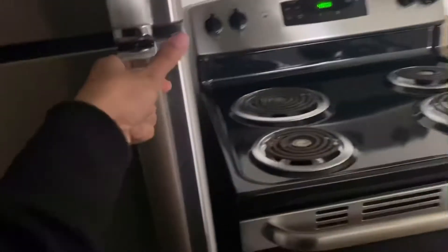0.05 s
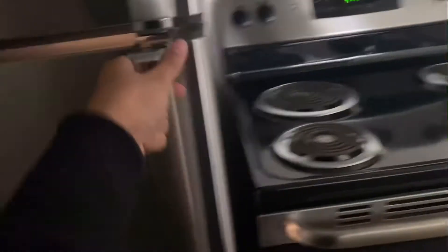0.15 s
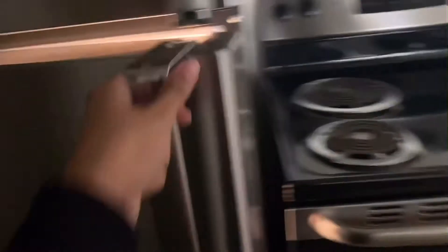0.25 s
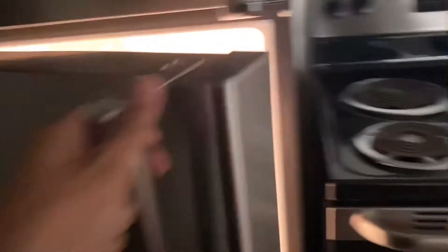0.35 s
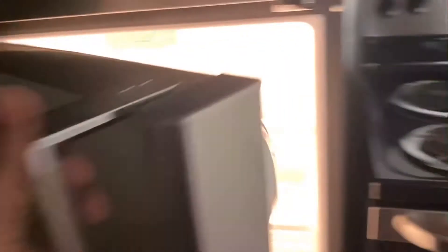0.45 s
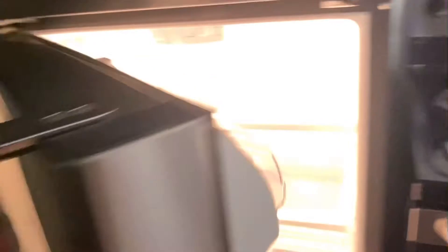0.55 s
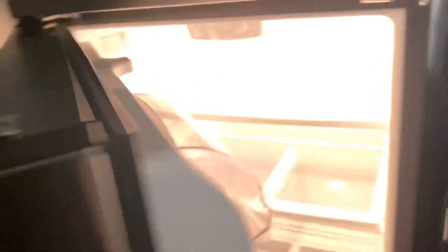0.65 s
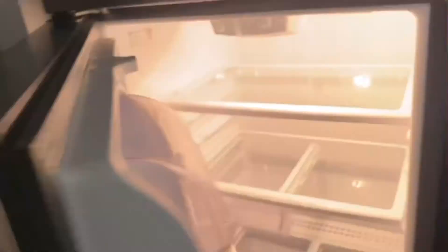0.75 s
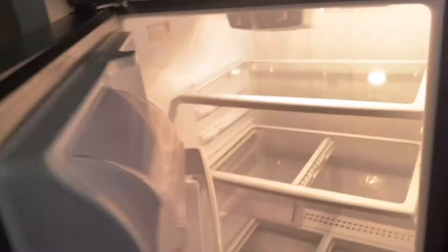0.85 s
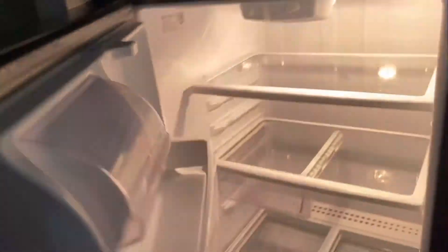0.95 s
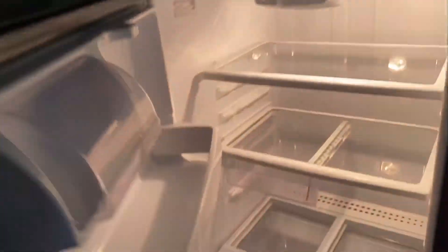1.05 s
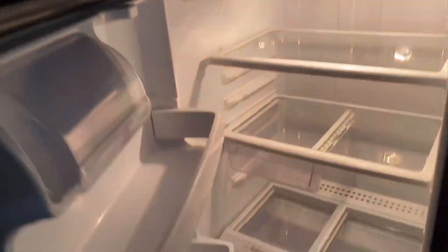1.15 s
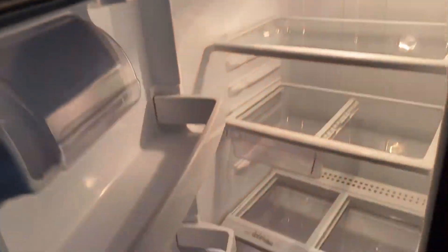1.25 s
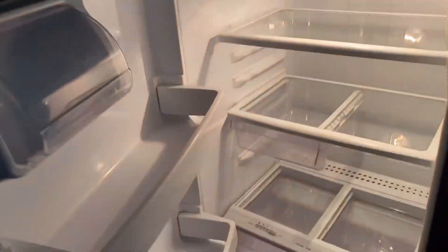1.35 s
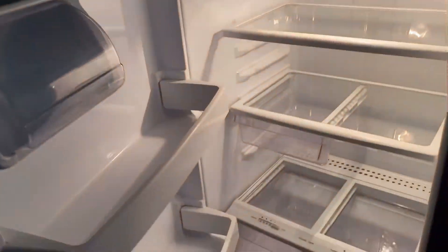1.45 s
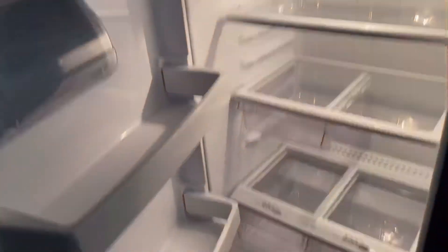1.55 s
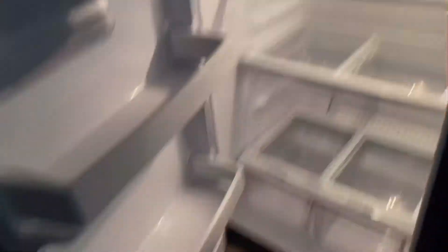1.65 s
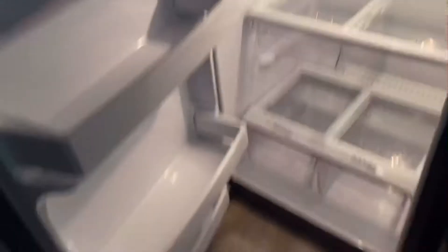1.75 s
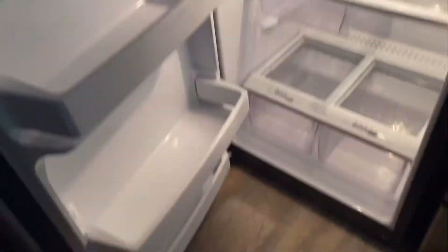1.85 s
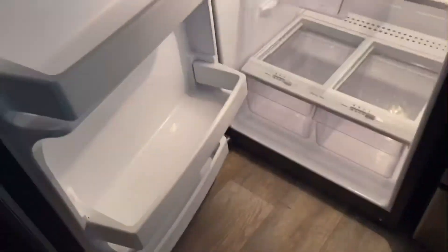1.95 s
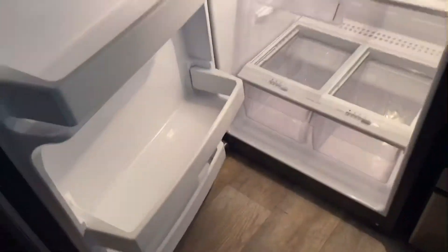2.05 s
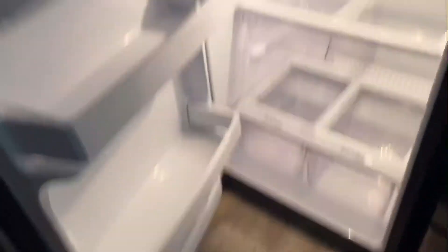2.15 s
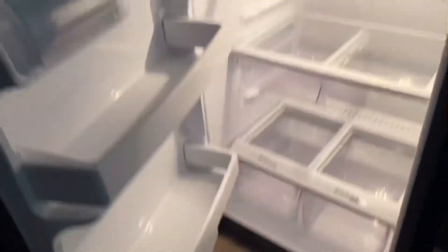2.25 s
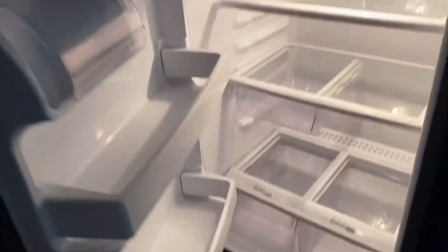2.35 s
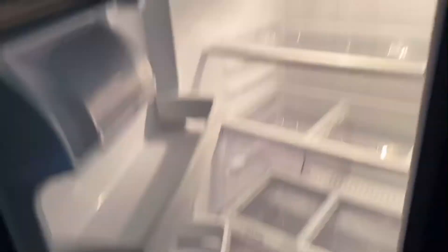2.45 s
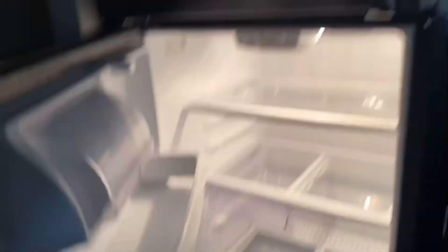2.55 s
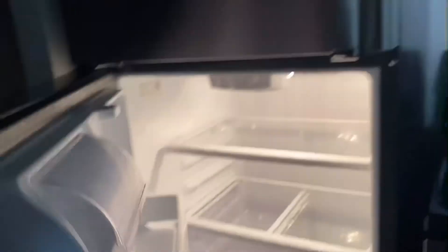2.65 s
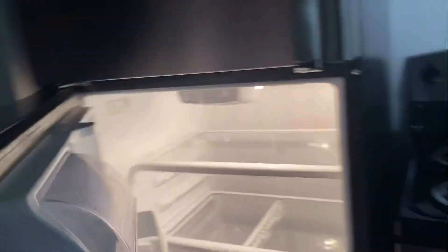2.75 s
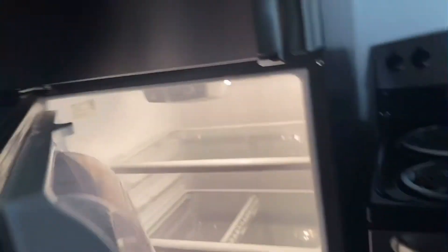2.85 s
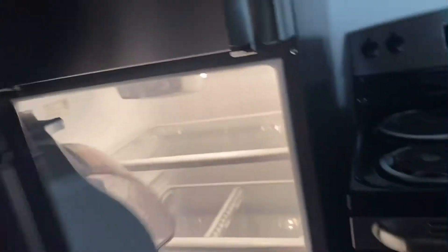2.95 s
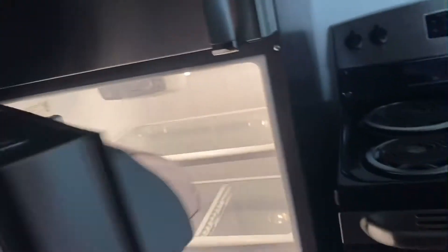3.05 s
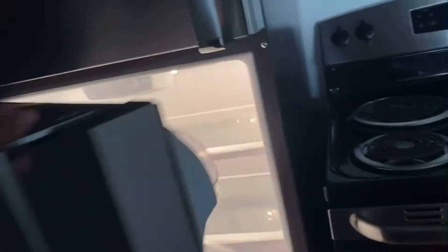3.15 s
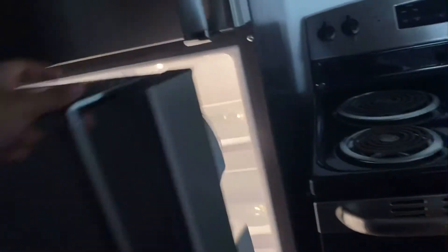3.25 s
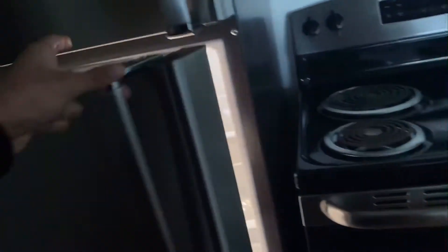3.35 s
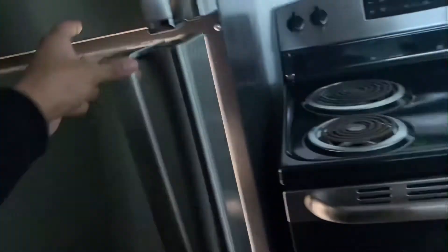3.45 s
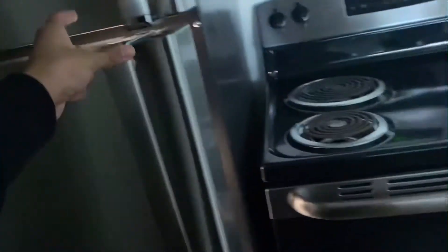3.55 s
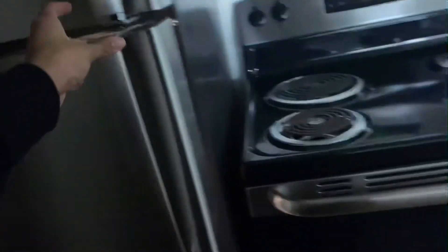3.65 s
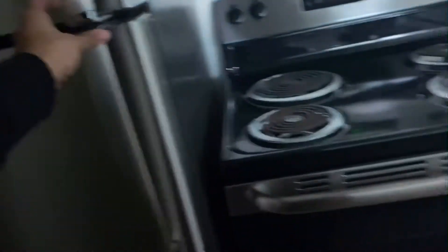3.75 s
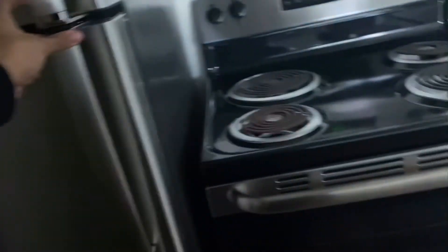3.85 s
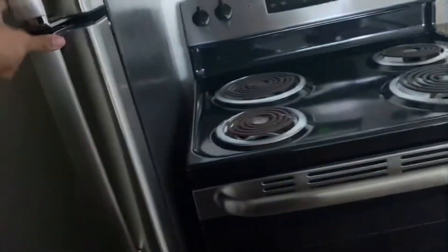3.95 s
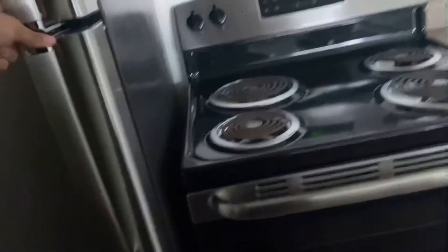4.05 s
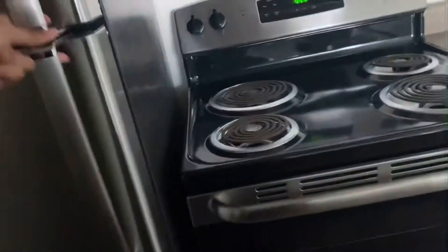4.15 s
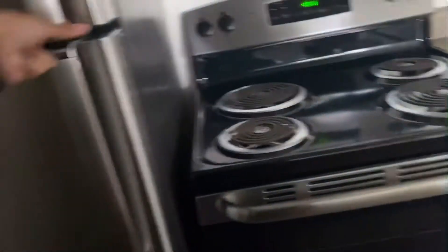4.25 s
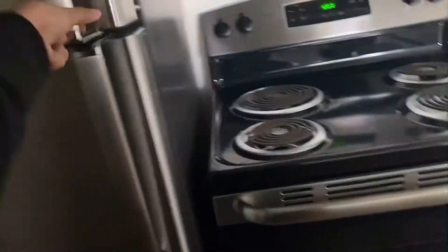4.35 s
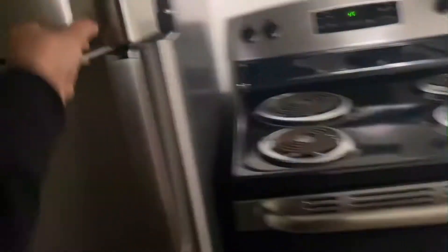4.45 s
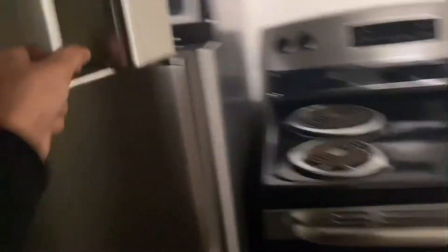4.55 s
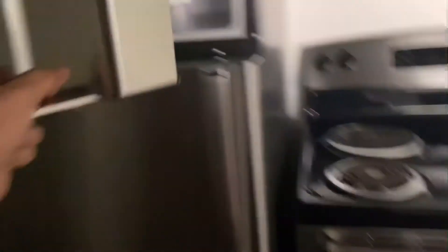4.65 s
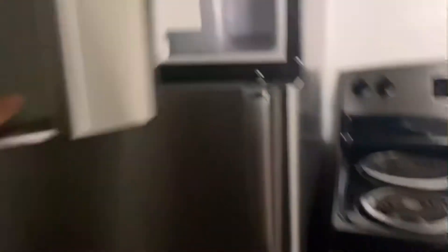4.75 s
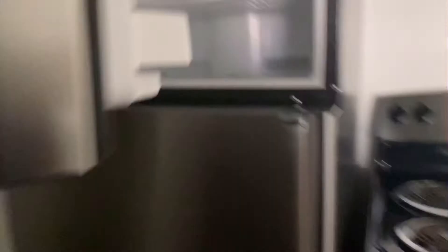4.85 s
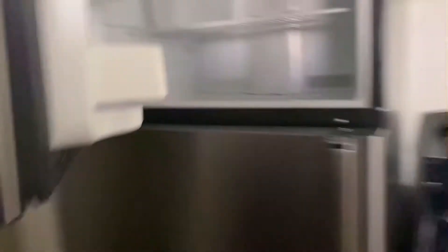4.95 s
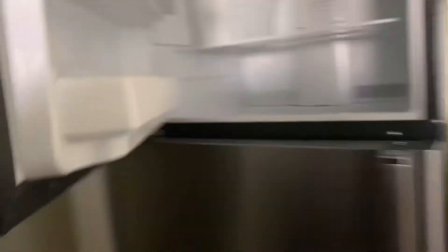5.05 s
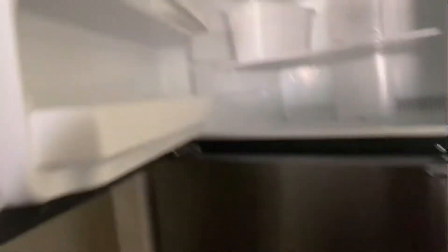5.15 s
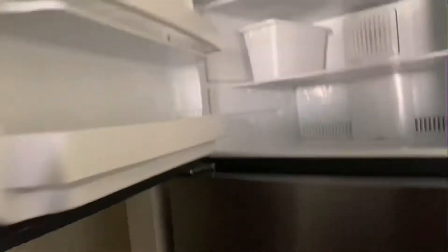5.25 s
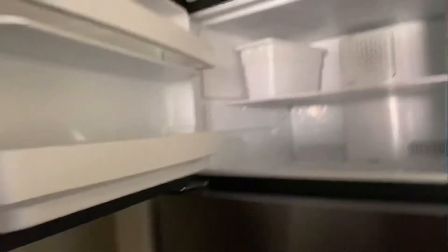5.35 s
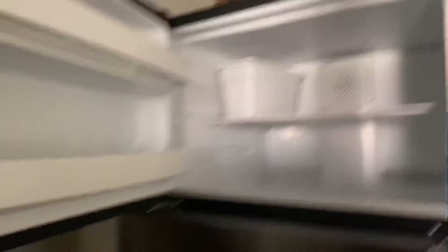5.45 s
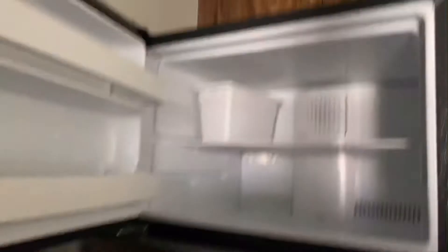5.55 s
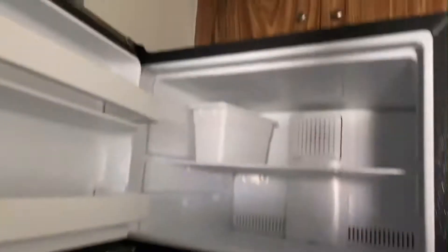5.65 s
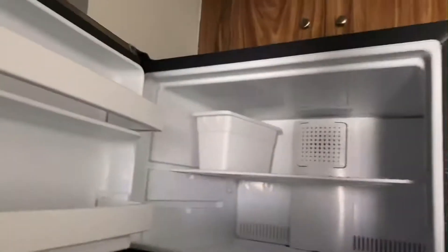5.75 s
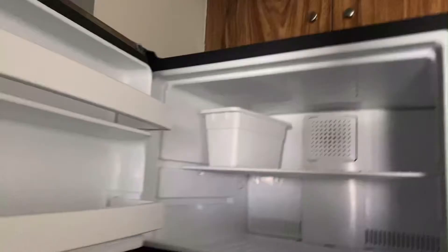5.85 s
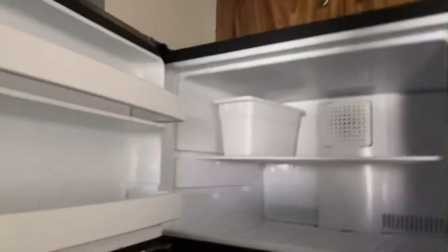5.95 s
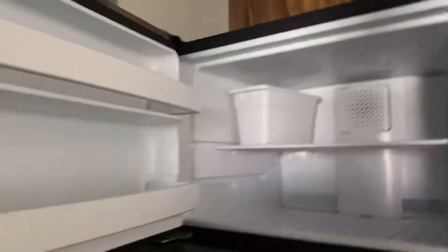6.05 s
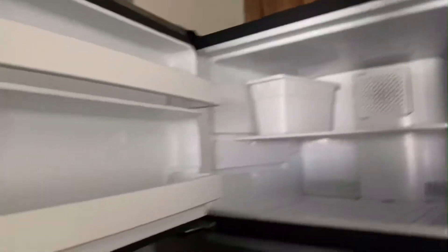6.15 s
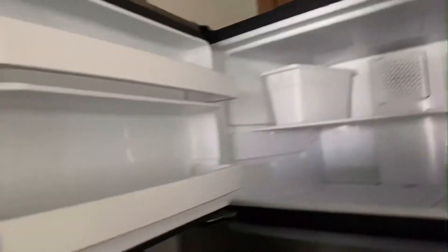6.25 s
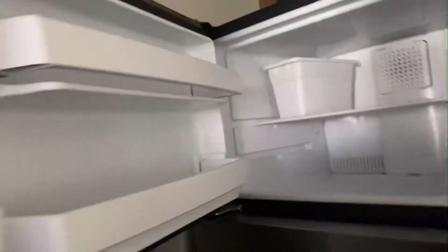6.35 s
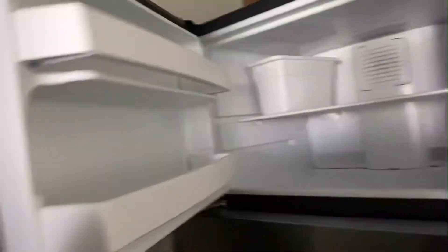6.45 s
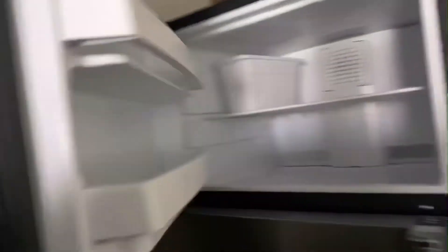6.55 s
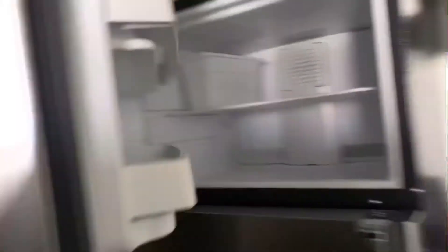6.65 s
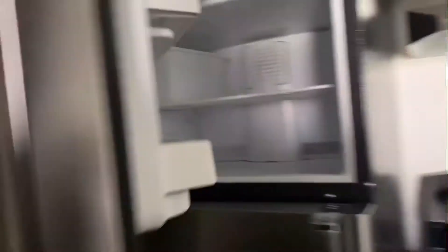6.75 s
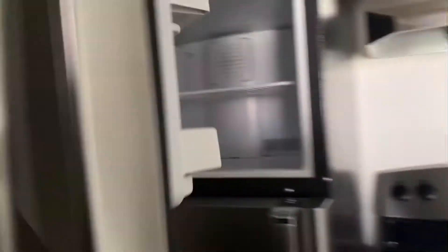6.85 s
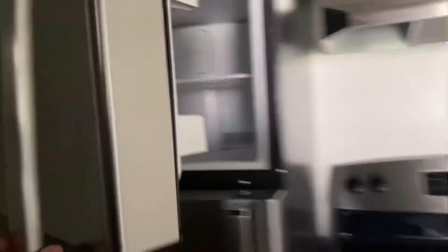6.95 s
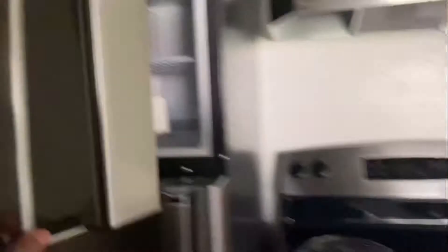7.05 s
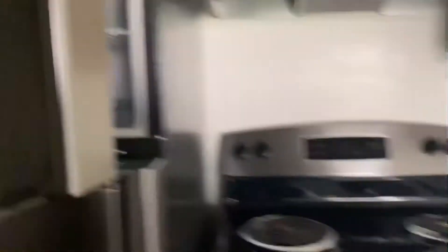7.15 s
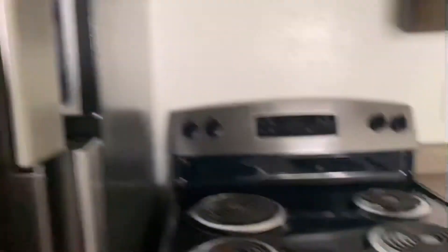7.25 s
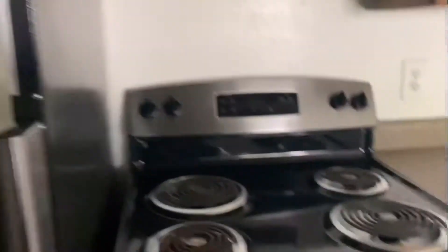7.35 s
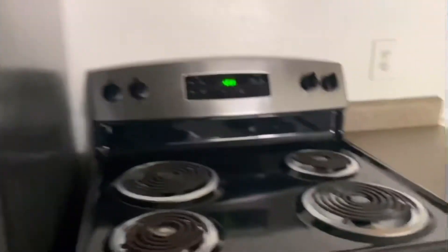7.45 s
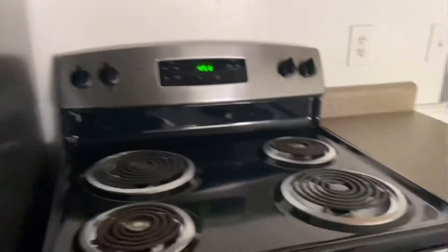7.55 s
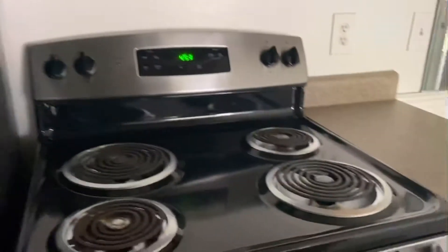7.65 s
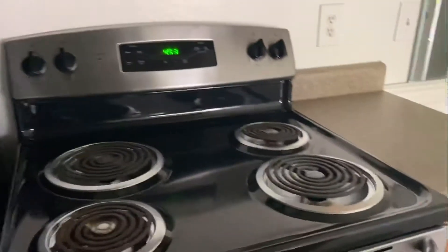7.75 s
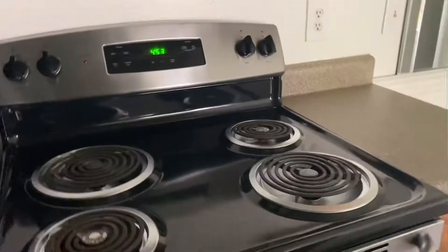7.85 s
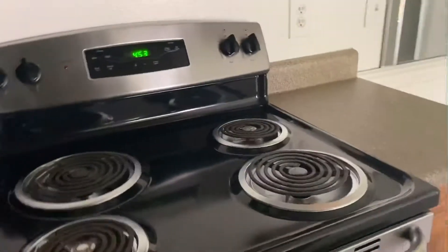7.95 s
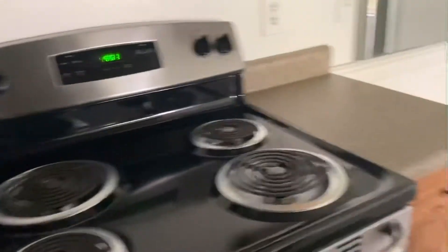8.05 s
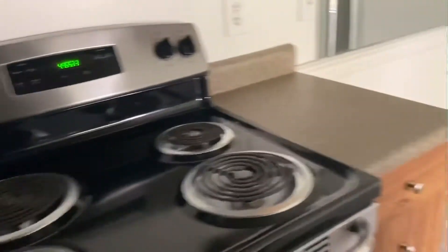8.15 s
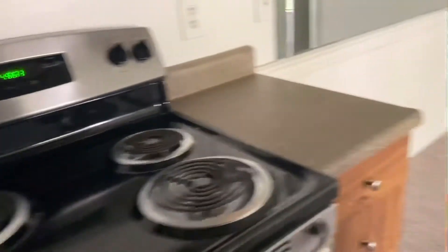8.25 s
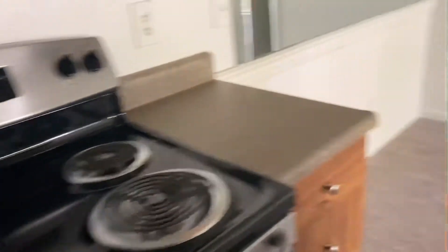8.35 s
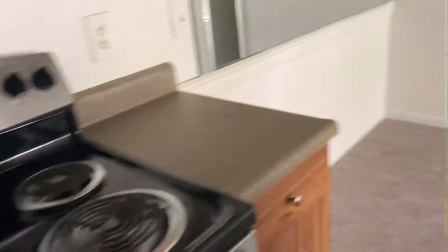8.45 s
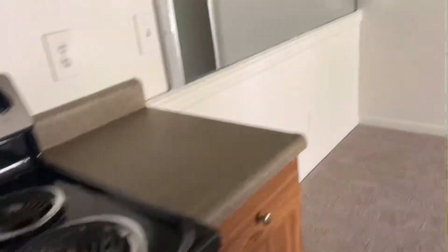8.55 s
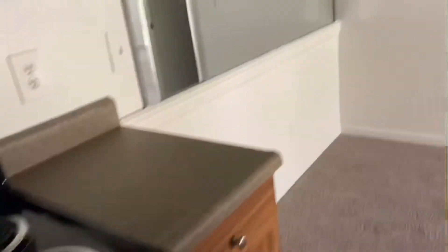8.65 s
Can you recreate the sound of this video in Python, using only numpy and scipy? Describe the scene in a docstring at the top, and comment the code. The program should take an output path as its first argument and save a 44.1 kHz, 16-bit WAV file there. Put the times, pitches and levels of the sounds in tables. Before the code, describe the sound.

Close, handheld stereo perspective in a small reverberant kitchen. Soft opening knock, faint ticks and dull hollow bumps as the fridge door swings, then a loud metallic slam with chattering handle. Half a second later the freezer handle snaps brightly and its door opens; after a quiet stretch of cloth rustle and soft footfalls, it slams with a hard crack and rattle.

```python
"""In a quiet kitchen a hand pulls a refrigerator open; its shelves tick as the door swings, and it is slammed.
The freezer handle clacks, that door opens and is slammed too. Soft steps, a sleeve and low ventilation lie beneath.
Slams layer a noise crack, shuddering panel noise, ringing modes and a falling flex chirp; fittings ring in modes.
Knocks, rubs, steps, cloth and air are shaped noise, crackles are tiny sine grains; a small hard room answers."""
import sys
import numpy as np
from scipy import signal
from scipy.fft import rfft, irfft, next_fast_len
from scipy.io import wavfile
from scipy.ndimage import uniform_filter1d

SR = 44100
rng = np.random.default_rng(int(sys.argv[2]) if len(sys.argv) > 2 else 0)


def transcribe(u):
    """Save the signal u as a 16-bit wav file named by the first command-line argument.

    u: samples, shape (n,) or (channels, n), limited to [-1, 1]; the rate is SR.
    q: integer samples, one column per channel.
    """
    v = np.clip(np.atleast_2d(u).T, -1, 1)
    q = np.round(v * 32767).astype(np.int16)
    wavfile.write(sys.argv[1], SR, q)


N = 383405  # length in samples

# Refrigerator slam: one row [t/s, bass level/dB, panel level/dB, crack level/dB, flex level/dB]
FRIDGE_SLAM = (3.717, -13.3, -17.3, -16.3, -8.5)
# What the refrigerator door rings with [f/Hz, level/dB, t60/s]
FRIDGE_MODES = [(58, 3, 0.16), (74, 8.5, 0.13), (122, 1, 0.15), (177.3, -0.5, 0.27), (241.4, -6, 0.22),
                (290.5, -3, 0.28), (354, -11, .25), (549, -6, 0.17), (590, -18, .33), (727, -17, 0.35),
                (784, -15, 0.29), (906, -30, .3), (1125, -27, .3), (1290, -23, 0.35), (1570, -25, 0.3),
                (2495, -26, 0.36), (2640, -25, 0.18)]
# Crowded higher modes of its steel skin and liner [f/Hz, level/dB per Hz]
FRIDGE_PANEL = [(25, -29), (70, 0), (220, 1), (480, -2), (750, -3.5), (1100, -7.5), (1700, -13.5),
                (2600, -14.5), (3600, -21.5), (7000, -29), (12000, -38), (16000, -39)]
# Its edge hitting the frame [f/Hz, level/dB per Hz]
FRIDGE_CRACK = [(200, -6), (800, -6), (1700, -4), (2600, 3), (5000, -6), (11000, -6), (16000, -15)]


def fridge_slam():
    """The refrigerator door hits its frame and sets skin, liner and cabinet ringing."""
    return slam(FRIDGE_SLAM, FRIDGE_MODES, FRIDGE_PANEL, FRIDGE_CRACK,
                crack_t60=0.017, panel_rise=0.0018, boom_cycles=2.0)


# Freezer slam: one row [t/s, bass level/dB, panel level/dB, crack level/dB, flex level/dB]
FREEZER_SLAM = (7.610, -10, -17.7, -10.8, -11)
# What the freezer door rings with [f/Hz, level/dB, t60/s]
FREEZER_MODES = [(57, 4.5, 0.18), (74, 6.5, 0.13), (106, -4, 0.2), (176.7, -10.5, 0.4), (291, -15.5, 0.36),
                 (353, -15, 0.27), (570, -17.5, 0.22), (655, -17, .2), (728, -13, 0.2), (836, -21, 0.18),
                 (1095, -20.5, 0.22), (1243, -18, 0.24), (1680, -21, 0.22), (1914, -22, .27),
                 (2300, -24, .2), (2498, -25, 0.223)]
# Crowded higher modes of its steel skin and liner [f/Hz, level/dB per Hz]
FREEZER_PANEL = [(25, -28), (70, 3), (200, -1), (450, -6.5), (680, -1.5), (1100, -8.5), (1700, -7),
                 (2300, -12.5), (3600, -18), (6000, -26), (11000, -29.5), (16000, -41)]
# Its edge hitting the frame [f/Hz, level/dB per Hz]
FREEZER_CRACK = [(200, -4), (1300, -3), (2200, 6), (5000, -8), (11000, -9), (16000, -18)]


def freezer_slam():
    """The freezer door hits its frame and sets skin, liner and cabinet ringing."""
    return slam(FREEZER_SLAM, FREEZER_MODES, FREEZER_PANEL, FREEZER_CRACK,
                crack_t60=0.016, panel_rise=0.0015, boom_cycles=1.26)


# How long the panels shudder [f/Hz, t60/s]
PANEL_T60 = [(60, 0.33), (400, 0.33), (2000, 0.32), (6000, 0.3), (14000, 0.21)]
# Stereo lean of the door's body [f/Hz, left minus right level/dB]
LEAN = [(60, 1.2), (200, 1), (650, 5.5), (1300, 0), (2500, 2), (12000, 2)]
BODY_LOW_HZ = 36  # high-pass corner of the slam's body; the slam is weak below this
SHUDDER_DB = 3.7  # the loose panels rattle unevenly


def slam(blow, modes, panel, edge, crack_t60, panel_rise, boom_cycles):
    """The edge cracks on the frame, the skin flexes, panels shudder and the cabinet booms, a little left."""
    s, bass_db, panel_db, crack_db, flex_db = blow
    t, out = np.arange(SR // 2) / SR, np.zeros((2, N))
    crack = noise(spectrum(edge), size=len(t)) * fade(t, crack_t60)
    rattle = rattling(noise(spectrum(panel), size=len(t)), SHUDDER_DB)
    shudder = dying(rattle, PANEL_T60) * (1 - np.exp(-t / panel_rise))
    boom = ring(modes, rise_cycles=boom_cycles, rough=4.5)
    body = amp(panel_db) * shudder + amp(bass_db) * boom + amp(flex_db) * flex(t)
    body = signal.sosfilt(signal.butter(2, BODY_LOW_HZ, "high", fs=SR, output="sos"), body)

    def lean(hz):
        return amp(along(LEAN, hz) * np.array([[.5], [-.5]]))

    add(out, s, amp(crack_db) * crack + filtered(body, lean))
    return out


# Start pitch, time to fall two octaves, decay, and lead at the left channel
FLEX_HZ, FLEX_GLIDE_S, FLEX_T60_S, FLEX_LEAD_S = 900, .007, .1, .0004
FLEX_RISE_S = .0045  # its slow, low part is the strongest


def flex(t):
    """A bending wave in the steel skin: its high notes outrun the low ones, so the pitch drops fast."""
    t = np.maximum(t - np.array([[0], [FLEX_LEAD_S]]), 0)
    cycles = FLEX_HZ * t / (1 + t / FLEX_GLIDE_S)
    return np.sin(2 * np.pi * cycles) * fade(t, FLEX_T60_S) * (1 - np.exp(-t / FLEX_RISE_S))


def rattling(x, depth_db):
    """Loose parts make the strength flicker, each part of the spectrum on its own."""
    z = signal.stft(x, nperseg=256)[2]
    field = rng.standard_normal(z.shape[1:])
    field = uniform_filter1d(field, size=5, axis=0)  # smooth over frequency
    field = uniform_filter1d(field, size=3, axis=1)  # smooth over time
    flickering = signal.istft(z * amp(depth_db * unit(field)), nperseg=256)[1]
    return unit(flickering[:, :x.shape[1]])


# The freezer handle takes up its play [t/s, level/dB]
HANDLE_BLOWS = [(4.270, -28), (4.286, -44.5), (4.304, -45)]
# What the freezer handle rings with [f/Hz, level/dB, t60/s]
HANDLE_MODES = [(1545, -12, 0.22), (2505, 1, 0.08), (3090, -8, 0.06), (3500, -5, 0.045), (3800, -6, .06),
                (3950, 2.5, 0.08), (6780, -17, .24), (7280, -6.5, 0.08), (7750, -8, .045), (8200, -4, 0.05),
                (11200, -10, .06), (12130, -11, .08), (14600, -12, .06)]


def freezer_handle():
    """The freezer handle snaps through its play with a long, bright clack."""
    return clack(HANDLE_BLOWS, HANDLE_MODES, crack_db=-8.5, crack_t60=0.115, crack_hz=7500, rough=18)


# The refrigerator handle knocks when pulled and pushed, and chatters after the slam [t/s, level/dB]
GRIP_BLOWS = [(0.093, -41), (0.104, -43), (3.656, -29.5), (3.735, -36), (3.746, -34), (3.759, -35),
              (3.866, -43)]
# What the refrigerator handle rings with [f/Hz, level/dB, t60/s]
GRIP_MODES = [(2227, -3, 0.1), (2340, -2, 0.037), (2487, -1, 0.048), (2750, -6.5, .04), (4700, -13, 0.06),
              (6250, -17, 0.05)]


def fridge_handle():
    """The refrigerator handle knocks and chatters, mostly ring and hardly any crack."""
    return clack(GRIP_BLOWS, GRIP_MODES, crack_db=-26, crack_t60=.07, crack_hz=4500, rough=16)


# A hinge fitting snaps as the door swings wide [t/s, level/dB]
STAY_BLOWS = [(0.823, -41), (0.843, -51.5)]
# What the hinge fitting rings with [f/Hz, level/dB, t60/s]
STAY_MODES = [(3100, -9, 0.036), (4200, -13, 0.1), (4867, -7.5, 0.16), (5050, -9, 0.08), (5650, -6, 0.09),
              (6350, -4, 0.055), (7450, -11, .06), (9600, -9, .07), (10890, -8, 0.06), (13470, -7, .14)]


def hinge_snap():
    """A hinge fitting snaps and rings; its crowded top modes die away as a bright hiss."""
    snap = clack(STAY_BLOWS, STAY_MODES, crack_db=4.5, crack_t60=0.02, crack_hz=7000, rough=23)
    sizzle = taps([(s, db - 5.5, 12000, .6, 0.21) for s, db in STAY_BLOWS], rise=0.0011)
    return snap + sizzle


DULLING = .6  # treble lost by a weaker blow (dB per octave for each dB)


def clack(blows, modes, crack_db, crack_t60, crack_hz, rough):
    """A stiff fitting snaps against its seat and rings; its weaker blows ring duller."""
    t, out = np.arange(SR // 2) / SR, np.zeros((2, N))
    hardest = max(db for s, db in blows)
    for s, db in blows:
        crack = noise(hump(crack_hz, 1.5), size=len(t)) * fade(t, crack_t60)
        tilt = DULLING * (db - hardest)
        struck = [(hz, level + tilt * np.log2(hz / modes[0][0]), t60) for hz, level, t60 in modes]
        add(out, s, amp(db) * (ring(struck, rise_cycles=0.87, rough=rough) + amp(crack_db) * crack))
    return out


# The hinge creaks [t/s, level/dB]
CREAKS = [(0.978, -57), (1.008, -61.5)]
# Resonances of the creaking hinge [f/Hz, width/Hz, level/dB]
CREAK_RESONANCES = [(3117, 200, -2), (4414, 500, 0), (5800, 900, -7), (6918, 800, -5), (7967, 700, -5),
                    (11320, 1800, -7.5), (14500, 900, -9)]
CREAK_S = 0.093  # swell length; the peak comes at a quarter of it


def creak(grain_db):
    """The dry hinge slips under a short swell and sings in its own resonances."""
    t, out = np.arange(SR // 2) / SR, np.zeros((2, N))

    def colour(f):
        return sum(amp(db) / (1 + (2 * (f - hz) / width) ** 2) for hz, width, db in CREAK_RESONANCES)

    for s, db in CREAKS:
        add(out, s, amp(db) * noise(colour, size=len(t)) * swell(t, CREAK_S))
    return out * unit(amp(grain_db * wobble(300)))


# Shelves and fittings knock against the moving doors, and the refrigerator door bounces back after its slam
# [t/s, level/dB, centre f/Hz]
KNOCKS = [(0.094, -40.5, 850), (0.826, -52.5, 1300), (1.159, -46, 1710), (1.546, -44, 650),
          (1.809, -43, 650), (1.996, -51.5, 750), (2.140, -36, 280), (2.551, -40, 614), (3.555, -39, 400),
          (3.656, -38.5, 950), (3.832, -34, 300), (4.270, -43.5, 900), (4.290, -42, 1100),
          (7.729, -38, 500)]
# The hollow door answers each knock: one row [level over the knock/dB, centre f/Hz, spread/octaves, t60/s]
THUD = (-2, 218, 1, 0.24)


def knocks():
    """Each knock sounds at its own pitch and makes the hollow door thud."""
    thud_db, *hollow = THUD
    thuds = [(s, db + thud_db, *hollow) for s, db, hz in KNOCKS]
    return taps(contacts(KNOCKS, octaves=0.83, seconds=0.12), rise=.0005) + taps(thuds, rise=.002)


# Door bins rattle after a slam, or the gasket crackles as it lets go [t/s, level/dB, length/s, centre f/Hz]
CRACKLES = [(0.096, -47, .06, 2300), (3.729, -30, .15, 700), (4.283, -40, .08, 3000),
            (4.385, -47, .04, 2870), (7.620, -28.5, .14, 1900), (7.626, -28, .06, 900)]
CRACKLE_COUNT = 20  # grains per burst
CRACKLE_FALL_DB_PER_S, CRACKLE_SCATTER_DB = 100, 5.5  # how grains weaken and differ in strength
CRACKLE_OCTAVES, CRACKLE_CYCLES = 0.29, 29  # pitch scatter either way; cycles to lose 60 dB


def crackle():
    """Bursts of uneven little contacts, each at its own pitch, tending weaker as the burst goes on."""
    t, out = np.arange(SR // 20) / SR, np.zeros((2, N))
    for s, db, length, centre_hz in CRACKLES:
        for k, (when, pitch, size, apart) in enumerate(rng.uniform(-1, 1, (CRACKLE_COUNT, 4))):
            after = (k + .5 + when / 2) / CRACKLE_COUNT * length
            hz = centre_hz * 2 ** (CRACKLE_OCTAVES * pitch)
            phase = apart * np.array([[1], [-1]])
            grain = np.sin(2 * np.pi * hz * t + phase) * fade(t, CRACKLE_CYCLES / hz)
            grain_db = db - CRACKLE_FALL_DB_PER_S * after + CRACKLE_SCATTER_DB * size
            add(out, s + after, amp(grain_db) * grain)
    return out


# Tiny ticks of plastic trim [t/s, level/dB, centre f/Hz, spread/octaves]
TICKS = [(0.406, -51.5, 5500, .8), (1.159, -42, 4800, .7), (1.159, -44, 12000, .5), (1.169, -48, 4000, .7),
         (2.899, -51, 8000, .7), (2.917, -51, 12100, .7), (2.981, -49, 7340, .7), (3.700, -35, 12500, .7),
         (3.794, -37, 13000, .7), (3.936, -42, 11500, .7), (4.592, -42, 3000, .35), (4.612, -53, 2900, .35),
         (4.800, -43, 7500, .5), (4.800, -46, 3300, .5)]


def ticks():
    """Plastic trim ticks: sharp, dry contacts."""
    return taps([(*tick, 0.015) for tick in TICKS], rise=.0002)  # t60 in s


# The rubber gasket peels off or a closing door drags [t/s, level/dB, centre f/Hz]
DRAGS = [(0.120, -47.5, 647), (3.540, -43, 840), (3.688, -43, 350), (4.238, -38.5, 453), (7.375, -51, 650)]
# Dry hinges and fittings scrape [t/s, level/dB, centre f/Hz]
SCRAPES = [(3.680, -51, 2200), (4.243, -51.5, 3300), (4.238, -55, 12000), (4.300, -51, 11000)]


def drags_and_scrapes(grain_db):
    """Surfaces stick and slip in tiny grains under a short swell."""
    t, out = np.arange(SR // 4) / SR, np.zeros((2, N))
    rows = contacts(DRAGS, octaves=0.95, seconds=0.063) + contacts(SCRAPES, octaves=.7, seconds=0.067)
    for s, db, hz, octaves, length in rows:
        add(out, s, amp(db) * noise(hump(hz, octaves), size=len(t)) * swell(t, length))
    return out * unit(amp(grain_db * wobble(300)))


# Soft thumps of feet and shifting weight [t/s, level/dB, centre f/Hz]
THUMPS = [(0.108, -35.5, 90), (0.130, -35, 80), (0.193, -38, 65), (1.575, -35.5, 90), (1.770, -34, 70),
          (2.150, -36, 60), (4.320, -37.5, 70), (5.255, -38.5, 90), (7.445, -37, 100), (8.045, -40, 110)]


def thumps():
    """Feet and shifting weight press the floor: soft, low, slow-starting contacts."""
    return taps(contacts(THUMPS, octaves=0.83, seconds=.26), rise=0.0018)


# The hiss as the arm reaches, pulls and pushes, before the sleeve's gain [t/s, level/dB]
SLEEVE_LEVEL = [(0.0, -62), (0.16, -75.5), (0.76, -79.5), (1.16, -75.5), (2.0, -92), (2.14, -77.6),
                (2.28, -85.1), (2.94, -73), (3.12, -83), (3.32, -69.5), (3.56, -76), (4.06, -69),
                (4.2, -76), (4.62, -77), (4.8, -69.5), (5.1, -86), (6.16, -92), (7.18, -76), (7.42, -80),
                (8.68, -79.5)]
# Colour of the cloth [f/Hz, level/dB per Hz]
SLEEVE_COLOUR = [(300, -4.5), (850, 14), (1500, 6.5), (4000, 4), (7500, -3), (11000, -4.5), (16000, -9)]


def sleeve(gain_db, flutter_db):
    """Cloth hisses unevenly, swelling and sinking with the arm's moves."""
    level_db = np.interp(np.arange(N) / SR, *np.transpose(SLEEVE_LEVEL))
    return amp(level_db + gain_db + flutter_db * wobble(25)) * noise(spectrum(SLEEVE_COLOUR), size=N)


# How long the kitchen rings [f/Hz, t60/s]
KITCHEN_T60 = [(80, 0.87), (400, 0.72), (2500, 0.66), (7000, 0.65), (15000, 0.34)]
CUPBOARD_HZ = 300  # longer waves bend round the cupboards


def kitchen(x, early_db):
    """Near cupboards throw back distinct copies, then the small hard room rings on."""
    t = np.arange(SR * 3 // 4) / SR
    colour = spectrum([(60, -7.5), (400, 0.0), (15000, -1.0)])
    tail = dying(noise(colour, size=len(t)), KITCHEN_T60) * (1 - np.exp(-(t / 0.0075) ** 2))
    tail /= np.linalg.norm(tail[0])
    early = np.zeros_like(tail)
    for side in early:
        side[(SR * rng.uniform(.003, .02, size=5)).astype(int)] += amp(early_db)
    early = signal.sosfilt(signal.butter(1, CUPBOARD_HZ, "high", fs=SR, output="sos"), early)
    return signal.oaconvolve(x[:1], tail + early, axes=1)[:, :N]  # fed by the left channel


# Colour of the moving air [f/Hz, level/dB per Hz]
AIR = [(20, -14), (36, -7.5), (55, 0.5), (72, .5), (100, 1.5), (118, -3.5), (148, -15), (180, -5.5),
       (340, -6.5), (560, -14), (900, -18), (1250, -23), (2300, -32), (5000, -41.5), (15000, -64)]
# Hollow resonances that colour the ventilation [f/Hz, width/Hz, lift/dB]
DUCT = [(115, 14, 2.5), (235, 18, -1), (301, 32, 4), (452, 30.2, 2), (560, 41, 2), (876, 110, 4),
        (2320, 380, 2.5)]
# Faint steady tones in the ventilation [f/Hz, rms level/dB]
HUM = [(174, -57.5), (296, -61.5), (352, -63.5)]


def ventilation(level_db, drift_db):
    """Air rumbles through hollow resonances, with a faint wavering hum."""
    t = np.arange(N) / SR

    def colour(f):
        lift_db = sum(db / (1 + (2 * (f - hz) / width) ** 2) for hz, width, db in DUCT)
        return amp(along(AIR, f) + lift_db)

    air = noise(colour, size=N)
    hum = sum(amp(db) * unit(np.sin(2 * np.pi * hz * t + 1.37 * wobble(12))) for hz, db in HUM)
    return amp(level_db + drift_db * wobble(7)) * air + hum


def contacts(rows, octaves, seconds):
    """Give contacts of one kind their shared spread and duration."""
    return [(s, db, hz, octaves, seconds) for s, db, hz in rows]


def taps(rows, rise):
    """Damped contacts, each with one broad resonance; soft ones rise slowly."""
    t, out = np.arange(SR // 4) / SR, np.zeros((2, N))
    for s, db, hz, octaves, t60 in rows:
        tap = noise(hump(hz, octaves), size=len(t)) * fade(t, t60) * (1 - np.exp(-t / rise))
        add(out, s, amp(db) * tap)
    return out


def ring(modes, rise_cycles, rough):
    """Half a second of struck modes with drifting phase; WIDTH sets their phase gap between channels."""
    t, out = np.arange(SR // 2) / SR, np.zeros((2, SR // 2))
    for hz, db, t60 in modes:
        drift = rough * np.cumsum(rng.standard_normal(len(t))) / np.sqrt(SR)
        apart = np.arctan(amp(along(WIDTH, hz))) * rng.choice([-1, 1]) * np.array([[1], [-1]])
        swing = np.sin(2 * np.pi * (hz * t + rng.random()) + drift + apart)
        out += amp(db) * swing * fade(t, t60) * (1 - np.exp(-t * hz / rise_cycles))
    return out


# Stereo width of every noise and mode [f/Hz, side to mid level/dB]
WIDTH = [(60, -14), (200, -8), (380, -3.5), (700, 0), (1290, 3.5), (2380, -3.5), (4400, -4.5), (12000, 0)]


def noise(colour, size):
    """Stereo noise of rms 1, nearly mono in the bass and wider above."""
    def shape(hz):
        side = amp(along(WIDTH, hz))
        return colour(hz) * np.array([np.ones_like(side), side]) / np.hypot(1, side)

    mid, side = filtered(rng.standard_normal((2, size)), shape)
    return unit(np.array([mid + side, mid - side]))


def spectrum(points):
    """The colour given by (Hz, dB) points."""
    return lambda hz: amp(along(points, hz))


def hump(centre_hz, octaves):
    """The colour of one broad resonance, nearly 8 dB down at this many octaves either side."""
    return lambda hz: (1 + (np.log2((hz + 1) / centre_hz) / octaves / 2) ** 2) ** -4


def dying(x, t60s):
    """Each frequency of x dies at its own speed."""
    hz, t, z = signal.stft(x, SR, nperseg=256)
    decay = fade(t, along(t60s, hz)[:, None])
    return signal.istft(z * decay, SR, nperseg=256)[1][:, :x.shape[1]]


def filtered(x, response):
    """x times a response of frequency."""
    n = x.shape[-1]
    m = next_fast_len(n, True)
    return irfft(rfft(x, m) * response(np.fft.rfftfreq(m, 1 / SR)), m)[..., :n]


def wobble(rate):
    """A random curve, rate knots a second."""
    knots = rng.standard_normal(int(N * rate / SR) + 2)
    return np.interp(np.arange(N) * rate / SR, np.arange(len(knots)), knots)


def swell(t, length):
    """A rise to 1 at a quarter of the length, then a slower fall."""
    u = 4 * t / length
    return u * np.exp(1 - u)


def fade(t, t60):
    """A decay that loses 60 dB in t60."""
    return np.exp(-np.log(1000) * t / t60)


def along(points, hz):
    """(Hz, value) points read on a log frequency axis."""
    f, v = np.transpose(points)
    return np.interp(np.log(hz + 1), np.log(f + 1), v)


def amp(db):
    """Decibels to gain."""
    return np.exp(np.asarray(db) * np.log(10) / 20)


def unit(x):
    """x at rms 1."""
    return x / np.sqrt(np.mean(x ** 2) + 1e-20)


def add(track, s, sound):
    """Mix a sound into the track at s seconds."""
    start = round(s * SR)
    track[:, start:start + sound.shape[1]] += sound[:, :N - start]


def scene():
    """Both doors and their fittings ring in the kitchen, over steps, cloth and air."""
    doors = fridge_slam() + freezer_slam()
    fittings = freezer_handle() + hinge_snap() + creak(grain_db=2.5) + fridge_handle()
    small = knocks() + crackle() + ticks() + drags_and_scrapes(grain_db=3.5)
    send = amp(-12.5) * doors + amp(-9.0) * fittings + amp(-8.5) * small
    room = kitchen(send, early_db=-9.5)
    near = thumps() + sleeve(gain_db=9.5, flutter_db=2.0)
    return doors + fittings + small + room + near + ventilation(level_db=-45.0, drift_db=0.7)


TOP_HZ = 16000


def record(dry):
    """A steep band limit keeps nothing from TOP_HZ up."""
    return filtered(dry, lambda hz: hz < TOP_HZ)


dry = scene()
out = record(dry)
transcribe(out)
```